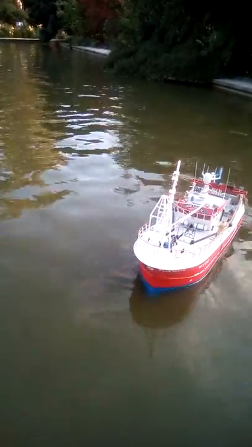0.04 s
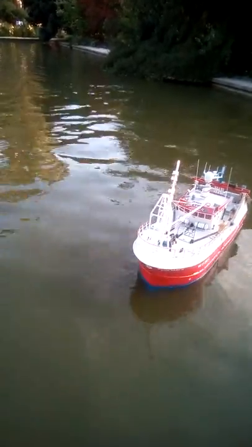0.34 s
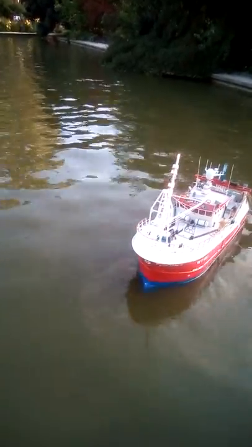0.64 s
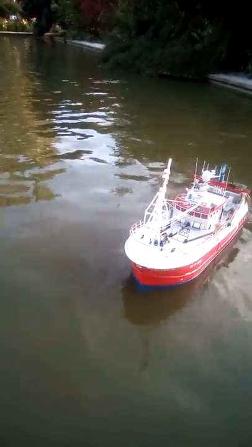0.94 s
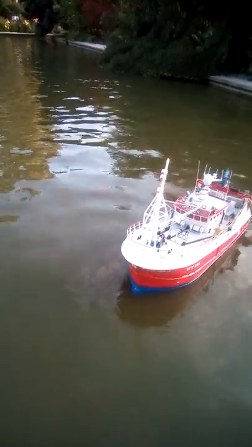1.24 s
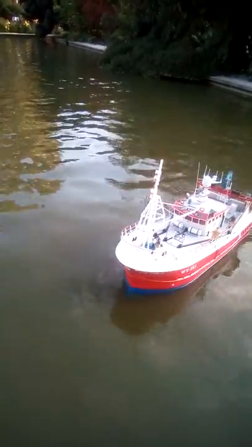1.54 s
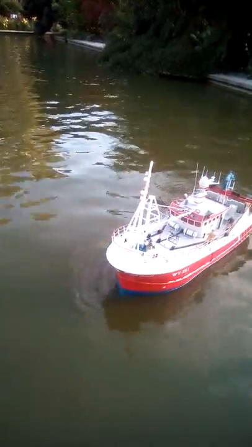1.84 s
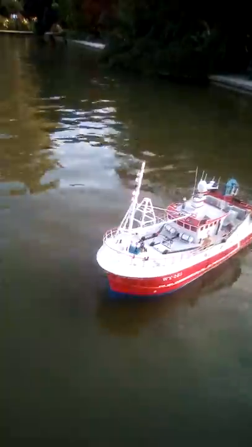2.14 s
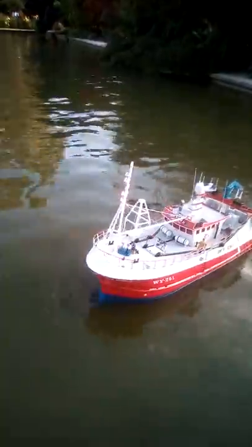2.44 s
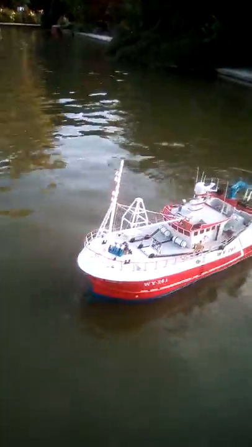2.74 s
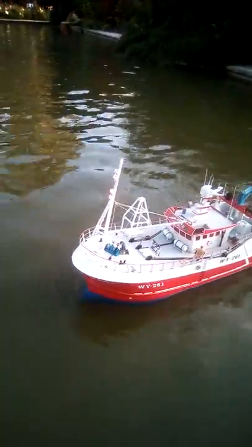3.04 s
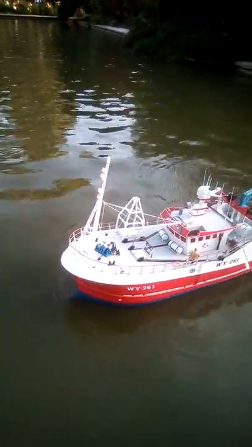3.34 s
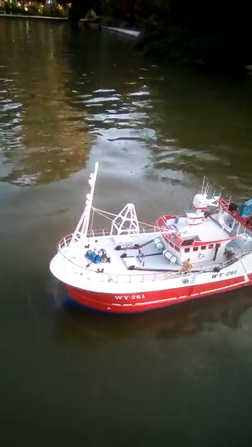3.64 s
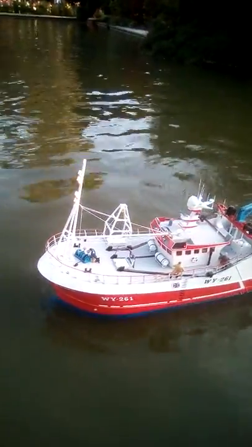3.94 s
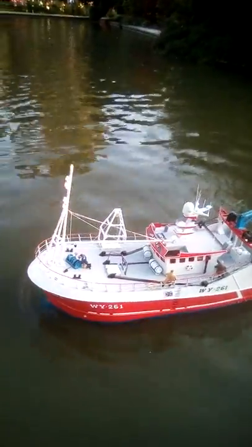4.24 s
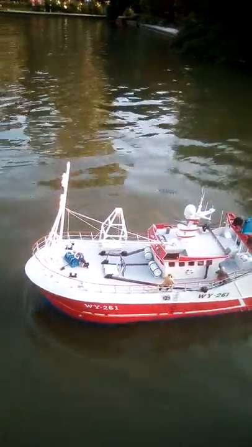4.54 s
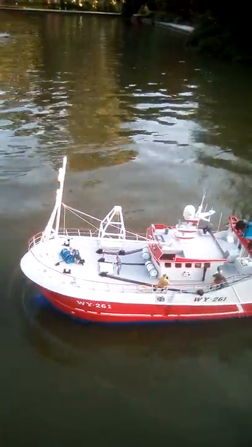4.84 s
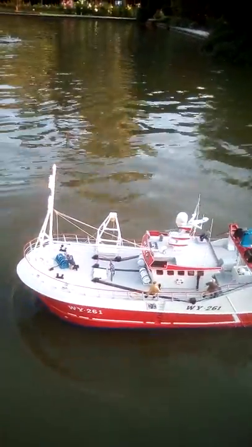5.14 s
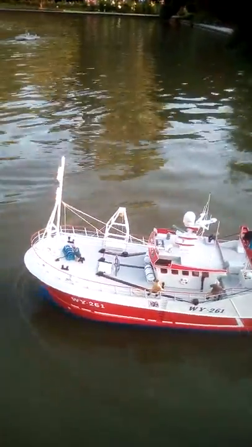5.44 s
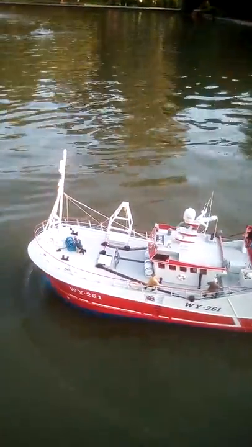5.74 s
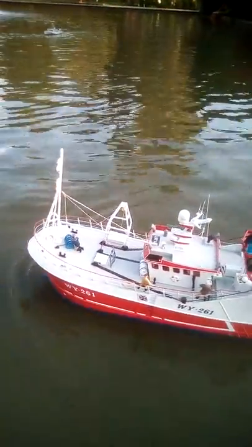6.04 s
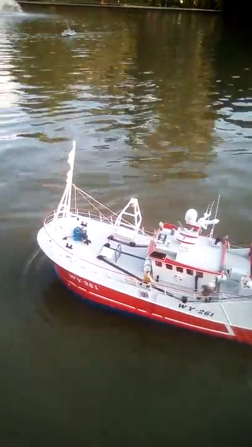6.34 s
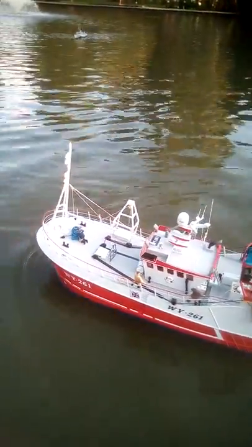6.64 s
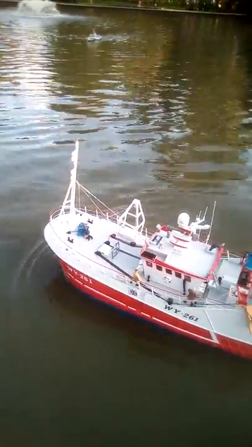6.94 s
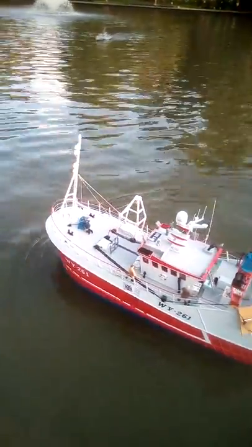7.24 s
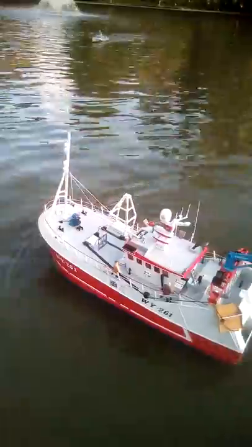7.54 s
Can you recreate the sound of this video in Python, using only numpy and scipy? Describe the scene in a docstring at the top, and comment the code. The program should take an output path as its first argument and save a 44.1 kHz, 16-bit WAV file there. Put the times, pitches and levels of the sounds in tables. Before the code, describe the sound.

Close throbbing drone of a small radio-controlled boat, with a thin whine and light water wash, dropping in pitch midway and growing louder.

```python
"""A radio-controlled model boat turns on a pond, close by. From the start its motor drives the hull into
a throbbing drone, the propeller shaft whines by friction, gears whirr and water washes. Two small ticks
sound. After three and a half seconds the motor slows, the whine dies away and a third tick follows.
The drone grows louder as the stern comes round; towards the end the hull screens the gears,
a far fountain patters and light air rumbles on the microphone."""
import sys
import numpy as np
from scipy.fft import rfft, irfft, next_fast_len
from scipy.io import wavfile
from scipy.ndimage import uniform_filter1d, map_coordinates

SR = 44100
rng = np.random.default_rng(int(sys.argv[2]) if len(sys.argv) > 2 else 0)


def unload_wav(signal):
    """Save mono or channel-first audio to the path in sys.argv[1] as 16-bit WAV at rate SR, clipped to [-1, 1]."""
    wavfile.write(
        sys.argv[1],
        SR,
        np.round(np.clip(np.atleast_2d(signal).T, -1, 1) * 32767).astype(np.int16),
    )


N = 335601

# Speed of the drive, with the throttle eased once: t/s, f/Hz (drive cycles a second)
DRIVE_SPEED = [(0, 17.72), (0.8, 17.68), (1.25, 17.53), (1.7, 17.69), (2, 17.4), (2.2, 17.7), (2.6, 17.52),
               (2.8, 17.12), (3.3, 17.02), (3.62, 17.08), (4, 15.14), (4.25, 14.45), (4.55, 14.46),
               (4.95, 14.21), (6.05, 14.34), (6.25, 14.55), (6.8, 14.22), (7.6, 14.4)]
def drive_turns():
    """Phase is the integral of frequency: the drive cycles completed at each sample."""
    return np.cumsum(curve(DRIVE_SPEED)) / SR


def slowed(cruise_hz=17.6, slow_hz=14.35):
    """Normalised loss of speed: about 0 when cruising, about 1 with the throttle eased."""
    return (cruise_hz - curve(DRIVE_SPEED)) / (cruise_hz - slow_hz)


def braking():
    """Deceleration of the drive, smoothed over half a second and scaled to 0-1."""
    rate = np.maximum(uniform_filter1d(np.gradient(slowed()), SR // 2), 0)
    return rate / rate.max()


# How far the stern has come round: t/s, share (0-1)
STERN_SHARE = [(0, 0.14), (1.3, 0), (3.4, 0.69), (4.9, 0.32), (6.2, 0.86), (7.6, 1)]
def astern():
    """Directivity: the boat is louder the more its stern faces the listener (0-1)."""
    return curve(STERN_SHARE)


# Spectral lines of the drive: order (multiple of the drive frequency), level/dB
DRIVE_LINES = [(7.05, -16.5), (9, -19.5), (9.55, -5), (10, -6.5), (11, -5), (13, -10.5), (13.55, -13),
               (14, -2), (14.3, -11), (15, -16), (16.7, -15.5), (18.33, -11), (19, -13.5), (20, -11.5),
               (20.5, -18), (21, -12.5), (22, -12.5), (22.5, -16.5), (24, -9), (25, -13), (27, -18.5),
               (28, -19.5)]
# Spectrum of the shaking between the lines: order, level/dB
SHAKE_SPECTRUM = [(4, -7), (8, -1), (10, 4.5), (13, 4), (16, -1), (21, 2), (24, -2), (28, 4.5), (40, -27.5)]
# Frequency response of the hull: f/Hz, level/dB
HULL_RESPONSE = [(50, -24.5), (100, -3), (124, -2), (137, -2), (152, -6), (172, -0.5), (186, -2.5),
                 (212, -5), (248, -3), (280, -1), (326, 3), (355, -6.5), (395, -8), (460, -18.5),
                 (600, -47.5)]
# The hull's upper boom, which fades twice as the boat turns: t/s, level/dB
UPPER_BOOM_LEVEL = [(0, -34.5), (0.75, -37.5), (1.15, -44.5), (1.7, -34.5), (2.8, -36), (3.85, -30),
                    (4.4, -31), (4.85, -38), (5.4, -27), (6.25, -24.5), (6.9, -26), (7.5, -22.5)]
def drone(turns, low_db=-31, stern_db=7, shake_db=-8.0, braking_db=7, flutter_db=1.82, slip_rad=0.2,
          split_hz=258):
    """Forced vibration: the drive's lines and rough shaking boom in the hull's two main resonances."""
    lines = np.zeros(N)
    for order, db in DRIVE_LINES:
        # the uneven load modulates each line in phase and amplitude
        phase = 2 * np.pi * (order * turns + rng.random()) + slip_rad * wobble(5)
        lines += amp(db + flutter_db * wobble(4)) * np.sin(phase)
    # the shaking runs on the drive's own clock, so it falls in pitch with the lines
    mean_hz = turns[-1] * SR / N
    shake = noise([(order * mean_hz, db) for order, db in SHAKE_SPECTRUM])
    shake = np.interp(turns / mean_hz * SR, np.arange(N), shake)
    hull = coloured(unit(lines) + amp(shake_db + braking_db * braking()) * shake, HULL_RESPONSE)
    low = filtered(hull, lambda hz: 1 / (1 + (hz / split_hz) ** 60))
    low_boom = amp(low_db + stern_db * astern()) * steady(low)
    upper_boom = amp(curve(UPPER_BOOM_LEVEL)) * steady(hull - low)
    return low_boom + upper_boom


# The drone's main note: t/s, level/dB
MAIN_NOTE_LEVEL = [(0, -32), (1.9, -36), (3.5, -32), (4, -25.5), (5.2, -27.5), (5.9, -29), (6.5, -22.5),
                   (7.6, -22)]
def notes(turns, beat_db=3.0, beat_cycles=9.85, first_beat_cycles=7.5, upper_db=-3, above_edge_db=-13,
          edge_hz=398, edge_width_hz=3, braking_db=-4, top_db=-67, stern_db=23,
          slip_rad=0.083, braking_slip_rad=0.98):
    """Three harmonics set the pitch: one beats slowly, one lies in the upper boom, one is heard astern."""
    beat = np.cos(2 * np.pi * (turns - first_beat_cycles) / beat_cycles)
    main = amp(curve(MAIN_NOTE_LEVEL) + beat_db * beat) * harmonic(turns, 12, slip_rad)
    # the upper note comes out below the edge of the hull's upper resonance, and breaks up in braking
    upper_hz = 23 * curve(DRIVE_SPEED)
    above_edge = 0.5 + 0.5 * np.tanh((upper_hz - edge_hz) / edge_width_hz)
    db = curve(UPPER_BOOM_LEVEL) + upper_db + above_edge_db * above_edge + braking_db * braking()
    upper = amp(db) * harmonic(turns, 23, slip_rad + braking_slip_rad * braking())
    top = amp(top_db + stern_db * astern()) * harmonic(turns, 30, slip_rad)
    return main + upper + top


def harmonic(turns, order, slip_rad):
    """Random phase modulation of a tone of rms 1 at a multiple of the drive frequency."""
    return np.sqrt(2) * np.sin(2 * np.pi * (order * turns + rng.random()) + slip_rad * wobble(12))


# Spectrum of the deck's buzz: f/Hz, level/dB
DECK_SPECTRUM = [(300, -39.5), (430, -2), (500, 4.5), (590, 4.5), (635, 4.5), (720, 0), (850, -12),
                 (1200, -55.5)]
# The deck buzzes harder: t/s, half length/s, rise/dB
DECK_SWELLS = [(0.2, .2, 3), (1.12, 0.23, 3.5), (2.4, 0.14, 3), (3.17, .16, 3), (4.75, .25, 4.5)]
def deck_buzz(turns, level_db=-45, stern_db=5.5, slow_db=-1.97, waver_db=0.75, line_db=-1,
              deck_hz=636, width_hz=40):
    """Resonance: the deck buzzes, and sings when a high line of the drive meets its natural frequency."""
    line = np.sin(2 * np.pi * 37 * turns + 0.5 * wobble(14))
    singing = resonance(line, deck_hz, width_hz)
    rise_db = swells(DECK_SWELLS)
    db = level_db + stern_db * astern() + slow_db * slowed() + rise_db + waver_db * wobble(5)
    return amp(db) * (noise(DECK_SPECTRUM) + amp(line_db + rise_db) * singing)


# Spectrum of the wash: f/Hz, level/dB
WASH_SPECTRUM = [(300, -8.5), (600, 0.5), (850, 0.5), (1000, -1.5), (1200, 0.5), (1350, -4), (1500, -19),
                 (2000, -21), (4000, -53)]
# Spectrum of the churning at the propeller: f/Hz, level/dB
CHURN_SPECTRUM = [(900, -27), (1500, -0.5), (1800, -1), (2100, 3), (2450, -3.5), (2800, -6.5),
                  (3200, -13.5), (3650, -23.5), (4300, -26.5), (5000, -28.5), (7000, -31), (9000, -43.5),
                  (14000, -61)]
def water(turns, wash_db=-47.5, stern_db=4.5, braking_db=2, churn_db=-51.5, surge_db=1.0,
          splash_db=1.98, drift_db=0.64):
    """Flow noise: a soft wash, and churning at the propeller that surges every second drive cycle."""
    surge = surge_db * np.sin(np.pi * turns + 0.49 * wobble(2))
    churn = noise(CHURN_SPECTRUM) * amp(churn_db + surge + splash_db * wobble(110))
    wash = noise(WASH_SPECTRUM)
    wash *= amp(wash_db + stern_db * astern() + braking_db * braking() + 0.93 * wobble(40))
    return amp(drift_db * wobble(3)) * (wash + churn)


# The shaft's whine: t/s, level/dB
WHINE_LEVEL = [(0, -61.5), (1.25, -65), (1.55, -58), (2.1, -57), (2.75, -61.5), (3.72, -63.5), (4, -77),
               (7.6, -78)]
def shaft_whine(turn_hz=43, pitch_hz=4510, sag_hz=260, brake_sag_hz=260, waver_hz=22, trim_db=-1,
                scrape_db=-4, patchy_db=2.0, lock_growth=1.3, brake_lock=0.8, grip=0.18, slip_rad=0.65):
    """Friction: the shaft rubs its tube once a turn, a whine over a scrape; braking lowers the whine."""
    whine_db = curve(WHINE_LEVEL)
    angle = 2 * np.pi * turn_hz * np.arange(N) / SR + 0.5 * wobble(4.7)
    contact = unit(1 + grip * (np.cos(angle) + np.cos(2 * angle + 1) + np.cos(3 * angle)))
    # the harder it rubs or brakes, the more the scrape locks into one steady tone
    lock = np.maximum(amp(lock_growth * (whine_db - whine_db.max())), brake_lock * braking())
    hz = pitch_hz - sag_hz * slowed() - brake_sag_hz * braking() + waver_hz * (1 - lock) * wobble(7)
    tone = np.sqrt(2) * np.sin(2 * np.pi * np.cumsum(hz) / SR + slip_rad * wobble(110))
    scrape = amp(scrape_db + patchy_db * wobble(8)) * ring(centre_hz=4580, width_hz=400)
    return amp(whine_db + trim_db) * contact * (lock * tone + scrape)


# Resonances of the gear case: f/Hz, width/Hz, level/dB
GEAR_CASE_MODES = [(2580, 55, 0.5), (2765, 150, -2), (2840, 70, -3)]
# The gears rasp harder: t/s, half length/s, rise/dB
GEAR_RASPS = [(1.0, .4, 3.5), (2.8, .15, 3.5), (3.85, .15, 3), (5.9, .3, 6.5)]
def gears(turns, whirr_db=-60.5, slow_db=-5.0, surge_db=3):
    """The gear case whirrs in its normal modes; when slow it is quieter and surges every second cycle."""
    case = sum(amp(db) * ring(hz, width_hz) for hz, width_hz, db in GEAR_CASE_MODES)
    surge = surge_db * np.sin(np.pi * turns + 0.5 * wobble(2))
    return amp(whirr_db + (slow_db + surge) * slowed() + swells(GEAR_RASPS) - hull_shadow()) * case


# Loose metal parts along the shaft: f/Hz, spread in log pitch, level/dB
FITTING_MODES = [(2740, .07, 0), (3290, 0.045, -1.5), (3935, 0.027, -6), (4420, 0.023, -5.5),
                 (5730, 0.03, -10.5), (6470, 0.03, -17.5)]
def chatter(turns, level_db=-64, slow_db=-1, cycles_per_20db=100, scatter_db=2.0, surge_db=4,
            blows=900, attack_s=0.00092):
    """Damped free vibration: loose parts ring under tiny blows, stronger every second drive cycle."""
    t = np.arange(SR // 28) / SR
    surge = amp(surge_db * np.sin(np.pi * turns + 0.48 * wobble(1.8)))
    out = np.zeros(N)
    for centre_hz, spread, db in FITTING_MODES:
        when, pitch, size = rng.random((blows, 3)).T
        starts = (when * (N - 1)).astype(int)
        hz = centre_hz * np.exp(2 * spread * (2 * pitch[:, None] - 1))
        strength = surge[starts] * amp(-scatter_db * np.log(0.019 + size))
        envelope = amp(-20 * centre_hz * t / cycles_per_20db) * (1 - np.exp(-t / attack_s))
        rings = strength[:, None] * np.sin(2 * np.pi * hz * t) * envelope
        out += amp(db) * unit(superpose(rings, starts))
    return amp(level_db + slow_db * slowed() - hull_shadow()) * out


def hull_shadow(start_s=5.75, db_per_s=7):
    """Acoustic shadow: the loss in dB as the hull comes in front of the gears and fittings."""
    return db_per_s * np.maximum(np.arange(N) / SR - start_s, 0)


# Spectrum of the rubbing in the shaft's tube: f/Hz, level/dB
TUBE_SPECTRUM = [(2500, -35.5), (3200, -2), (3450, 2.5), (3700, -14.5), (3930, -0.5), (4100, -11),
                 (4750, -7.5), (5100, -5), (5400, -6.5), (5750, 4), (6300, -15), (6900, -15), (7600, -26.5),
                 (11000, -42.5)]
# The shaft rubs harder: t/s, half length/s, rise/dB (the hiss takes half the rise)
SHAFT_SCRAPES = [(0.3, 0.27, 6), (2.28, 0.21, 12.5), (3.08, 0.24, 11), (3.75, .2, 7)]
def shaft_hiss(level_db=-72, slow_db=-3, rasp_db=2, squeal_hz=5760, squeal_width_hz=420, squeal_db=-6):
    """Friction noise excites the tube's resonances; in a few scrapes it swells and one stands out."""
    rise = amp(swells(SHAFT_SCRAPES))
    hiss = np.sqrt(rise) * noise(TUBE_SPECTRUM)
    squeal = amp(squeal_db) * (rise - 1) * ring(squeal_hz, squeal_width_hz)
    return amp(level_db + slow_db * slowed() + rasp_db * wobble(35)) * (hiss + squeal)


def whistle(turns, pitch_hz=8220, level_db=-90, start_s=5.0, length_s=0.68, ramp_s=0.06, surge_db=4):
    """Amplitude-modulated narrow-band noise: a faint whistle pulses briefly once the boat has slowed."""
    t = np.arange(N) / SR - start_s
    gate = np.clip(np.minimum(t, length_s - t) / ramp_s, 0, 1)
    return amp(level_db + surge_db * np.sin(np.pi * turns)) * gate * ring(pitch_hz, width_hz=70)


# Small ticks: t/s, level/dB, rebound gap/s
TICK_EVENTS = [(0.374, -35.5, .007), (1.9957, -31, 0.012), (4.183, -24.5, .0061)]
# Spectrum of a tick: f/Hz, level/dB
TICK_SPECTRUM = [(1000, -17.5), (2000, -6), (2800, -1), (3600, 2), (4550, 4), (4950, -19), (6200, -14.5),
                 (6700, -6.5), (9400, -14), (10300, -30), (15000, -35.5)]
def ticks(contact_db=14, rebound_db=5, tail_db=-29, tail_t60_s=0.14):
    """Impulse excitation: each tick is a sharp contact, two weaker rebounds and a short fizzing tail."""
    t = np.arange(N) / SR
    tails, contacts = np.zeros(N), np.zeros(N)
    for start_s, db, gap_s in TICK_EVENTS:
        decay = (t >= start_s) * amp(-60 * np.clip((t - start_s) / tail_t60_s, 0, 2))
        tails += amp(db + tail_db) * decay
        for k in range(3):
            contacts[round((start_s + k * gap_s) * SR)] += amp(db + contact_db - rebound_db * k * k)
    return coloured(contacts + 2 * tails * rng.standard_normal(N), TICK_SPECTRUM)


# A fountain across the pond comes round in front of the microphone: t/s, level/dB
FOUNTAIN_LEVEL = [(0, -80.5), (5, -71), (6.2, -62), (6.9, -58), (7.61, -54)]
# Spectrum of its spray: f/Hz, level/dB
SPRAY_SPECTRUM = [(900, 0), (1200, 5.5), (1500, -7), (2200, 4), (2800, -3), (3500, -13), (4500, -10),
                  (6300, -9), (7300, -22.5), (9000, -29.5)]
def fountain(scatter_db=1.6, cycles_per_20db=75, low_hz=1000, high_hz=8500, hiss_db=2, drops=3500,
             attack_s=0.0011):
    """Bubble resonance: each drop traps air that rings at its own pitch; the smallest blend to a hiss."""
    t = np.arange(SR // 32) / SR
    when, size, pitch = rng.random((drops, 3, 1)).transpose(1, 0, 2)
    hz = low_hz * (high_hz / low_hz) ** pitch
    strength = amp(-scatter_db * np.log(0.02 + size)) * np.sqrt(hz)
    envelope = amp(-20 * hz * t / cycles_per_20db) * (1 - np.exp(-t / attack_s)) * (1 - t / t[-1])
    bubbles = strength * envelope * np.sin(2 * np.pi * hz * t)
    patter = superpose(bubbles, starts=(when * (N - 1)).astype(int))
    spray = unit(patter) + amp(hiss_db) * rng.standard_normal(N)
    return amp(curve(FOUNTAIN_LEVEL)) * unit(coloured(spray, SPRAY_SPECTRUM))


# Wind on the microphone: t/s, level/dB
WIND_LEVEL = [(0, -50), (5.5, -50), (6.6, -43.5), (7.61, -46.5)]
# Spectrum of its rumble: f/Hz, level/dB
WIND_SPECTRUM = [(5, -15), (14, -2), (25, 1.5), (40, -16), (70, -6.5), (150, -25), (500, -80.5)]
# Spectrum of the microphone's own hiss: f/Hz, level/dB
SELF_NOISE_SPECTRUM = [(100, 7.5), (7000, 1.5), (10000, -6.5), (14000, -7), (14800, 15.5), (15500, 4.5)]
def air(gust_db=0.6, hiss_db=-79):
    """Pressure fluctuations of light gusts rumble on the microphone, over its self-noise."""
    rumble = amp(curve(WIND_LEVEL) + gust_db * wobble(3)) * noise(WIND_SPECTRUM)
    return rumble + amp(hiss_db) * noise(SELF_NOISE_SPECTRUM)


def amp(db):
    """Amplitude ratio of a level in dB."""
    return 10 ** (np.asarray(db) / 20)


def unit(x):
    """Normalisation to rms 1."""
    return x / np.sqrt(np.mean(x ** 2) + 1e-20)


def steady(x):
    """Normalisation to rms 1 over a sliding half second, which keeps the faster throb."""
    return x / np.sqrt(np.abs(uniform_filter1d(x ** 2, SR // 2)) + 1e-20)


def curve(rows):
    """Linear interpolation of (t/s, value) rows, one value a sample."""
    return np.interp(np.arange(N) / SR, *np.transpose(rows))


def swells(rows):
    """Gaussian rises in dB from (t/s, half length/s, rise/dB) rows."""
    t = np.arange(N) / SR
    return sum(db * np.exp(-((t - peak_s) / half_s) ** 2) for peak_s, half_s, db in rows)


def wobble(rate):
    """Smooth random modulation: a spline through `rate` random knots a second."""
    knots = rng.standard_normal(1024)
    coarse = np.arange(0, N + 64, 64)
    return np.interp(np.arange(N), coarse, map_coordinates(knots, [coarse * rate / SR], mode="wrap"))


def superpose(grains, starts):
    """Superposition of short sounds, one a row, each from its own starting sample."""
    samples = starts.reshape(-1, 1) + np.arange(grains.shape[1])
    return np.bincount(samples.ravel(), grains.ravel(), N)[:N]


def filtered(x, response):
    """Linear filtering: the spectrum of x times a function of frequency."""
    size = next_fast_len(N + 8192)
    return irfft(rfft(x, size) * response(np.fft.rfftfreq(size, 1 / SR)), size)[:N]


def coloured(x, spectrum):
    """Spectral shaping by (f/Hz, level/dB) rows, interpolated in log frequency."""
    row_hz, row_db = np.transpose(spectrum)
    return filtered(x, lambda hz: amp(np.interp(np.log(hz + 1e-3), np.log(row_hz), row_db)))


def noise(spectrum):
    """Gaussian noise of rms 1 with the given spectral shape."""
    return unit(coloured(rng.standard_normal(N), spectrum))


def resonance(x, centre_hz, width_hz):
    """Band-pass filtering by one Lorentzian peak."""
    return filtered(x, lambda hz: 1 / (1 + (2 * (hz - centre_hz) / width_hz) ** 2))


def ring(centre_hz, width_hz):
    """Narrow-band noise of rms 1: one resonance under random excitation."""
    return unit(resonance(rng.standard_normal(N), centre_hz, width_hz))


def scene():
    """Superposition of the boat and its surroundings on open water, in one channel."""
    turns = drive_turns()
    motor = notes(turns) + drone(turns) + deck_buzz(turns)
    running_gear = shaft_whine() + shaft_hiss() + gears(turns) + chatter(turns) + whistle(turns)
    return (motor + running_gear + water(turns) + fountain() + ticks() + air())[None]


def record(dry, limit_hz=15550):
    """Band limiting: an ideal low-pass filter keeps nothing above the limit."""
    return np.array([filtered(channel, lambda hz: hz < limit_hz) for channel in dry])


dry = scene()
out = record(dry)
unload_wav(out)
```